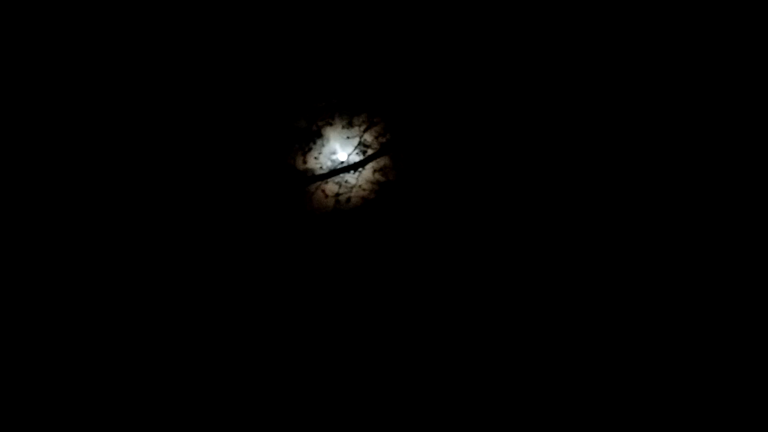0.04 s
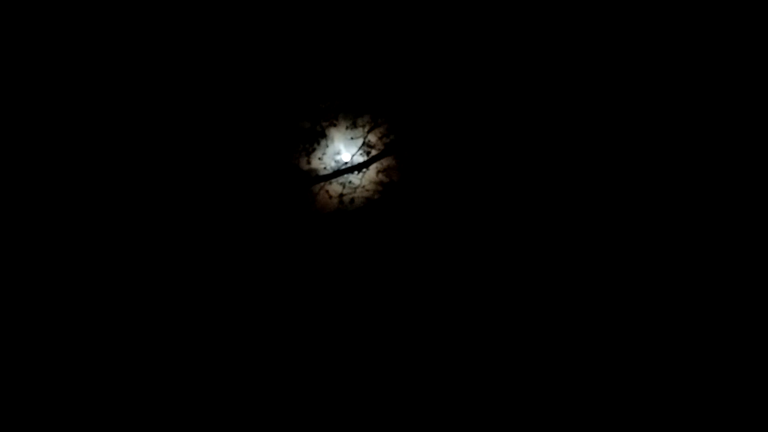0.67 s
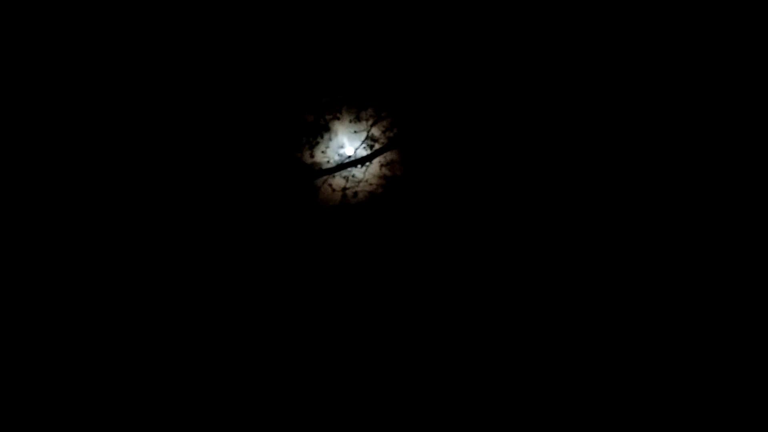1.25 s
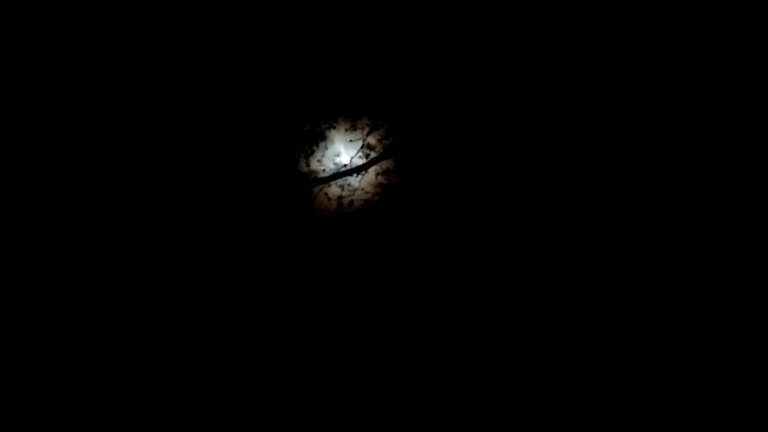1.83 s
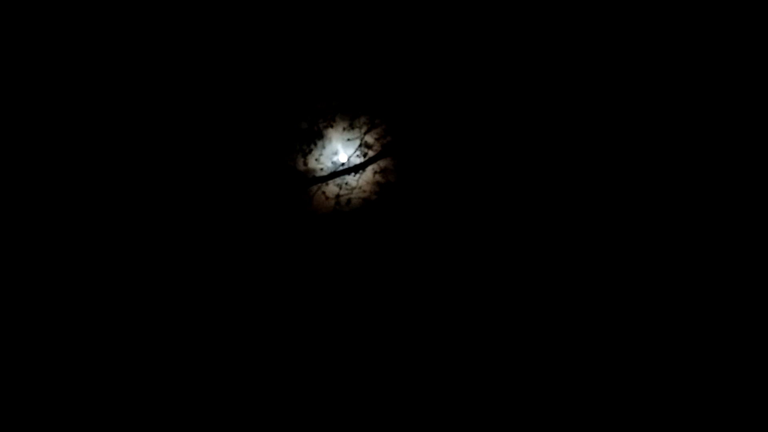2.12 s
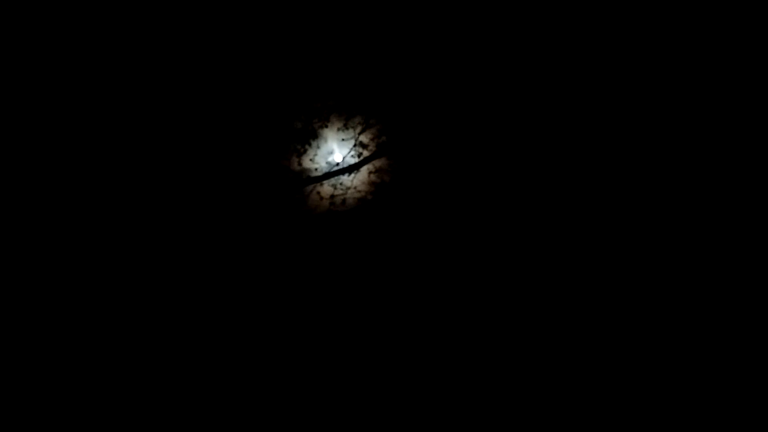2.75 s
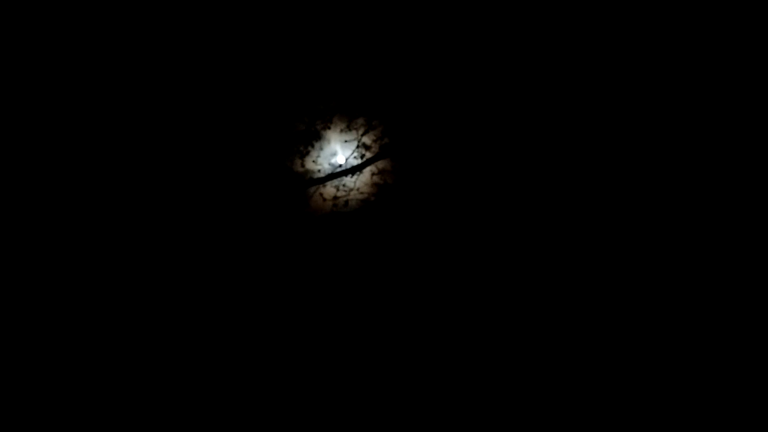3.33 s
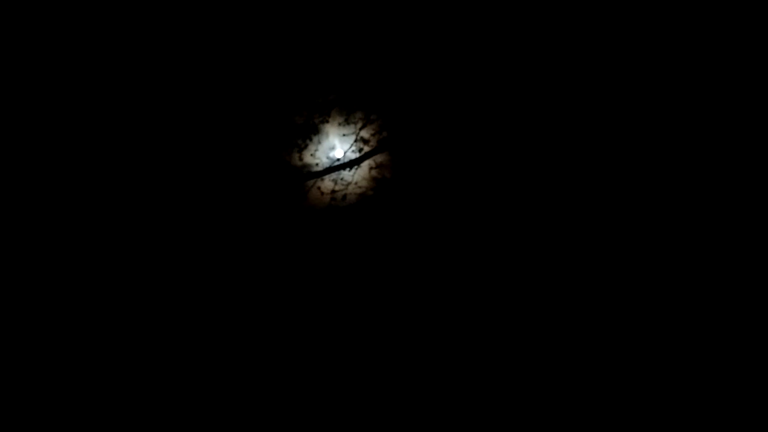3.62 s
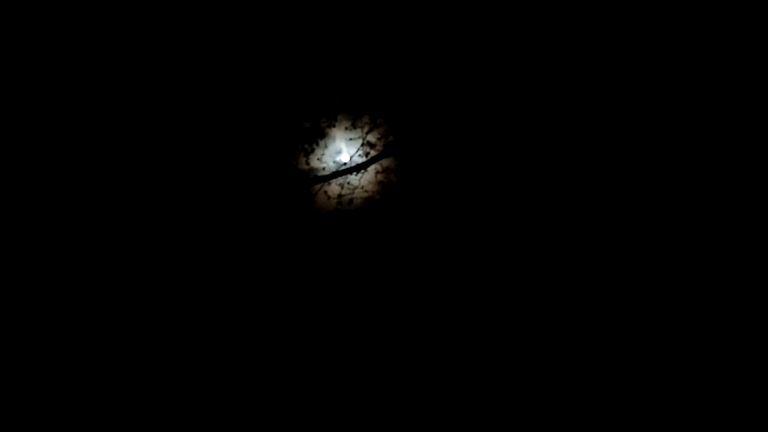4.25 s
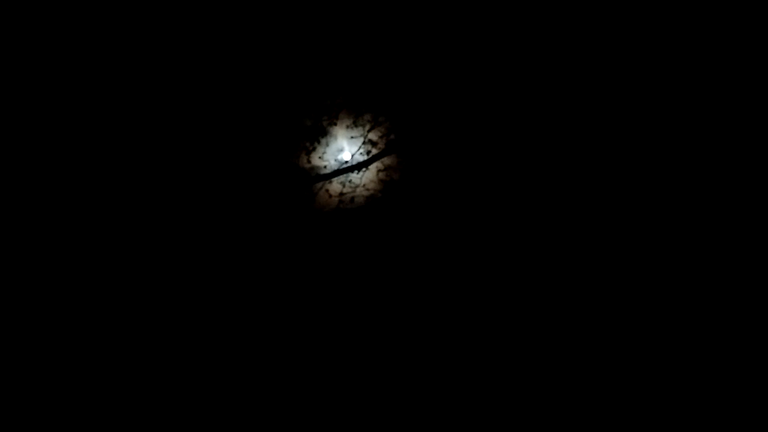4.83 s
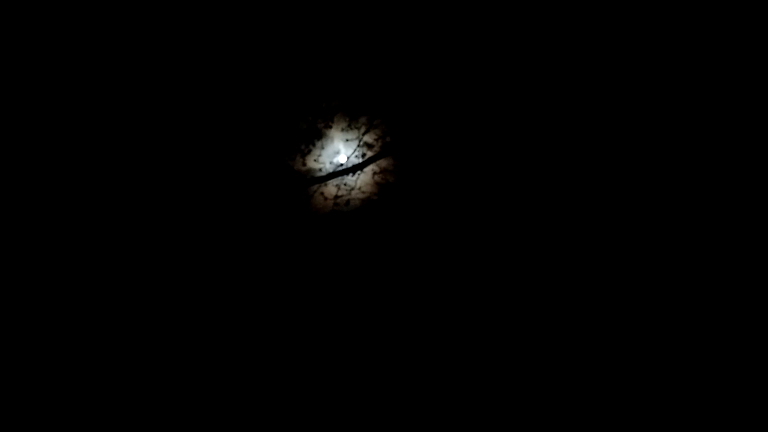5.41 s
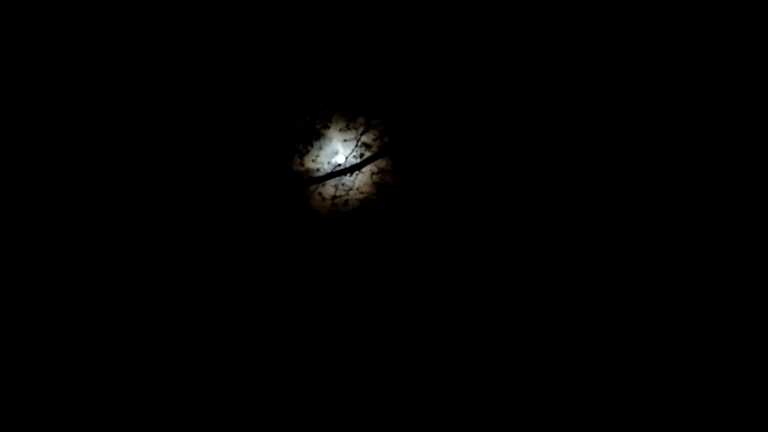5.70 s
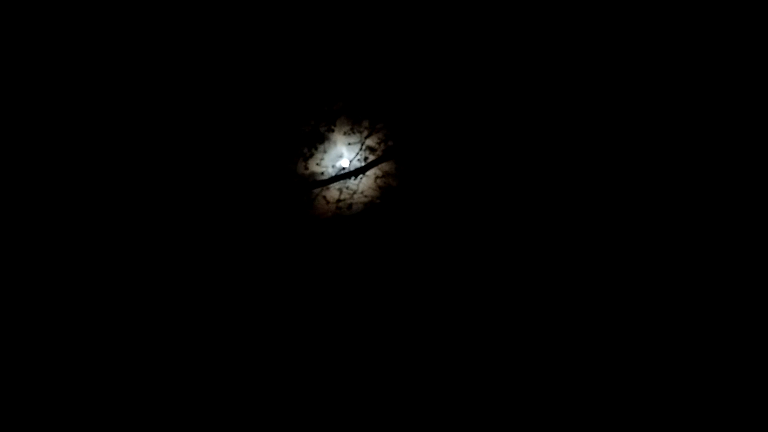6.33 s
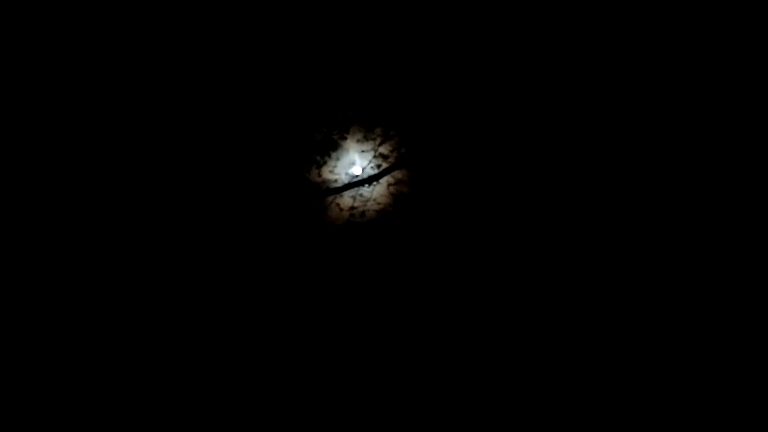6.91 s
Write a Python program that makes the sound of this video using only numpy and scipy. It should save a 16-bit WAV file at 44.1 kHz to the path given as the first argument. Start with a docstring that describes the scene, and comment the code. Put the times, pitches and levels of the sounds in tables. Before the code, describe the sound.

In a wood at night, three frogs take turns calling off to the left, about once a second. Each call is a train of short pips that climbs in pitch and swells, blurred by echoes into a rising rasp. A deep electrical hum in the stereo microphone cuts off after just over a second. The frogs carry on over soft hiss and a far road, where tyres pass and the roar slowly fades.

```python
"""A wood at night, heard through a camera's stereo microphone. After a short silence, far traffic
fades in behind a soft hiss, with a deep electrical hum in the camera. Off to the left, three frogs
take turns: each call is a train of short pips that climb in pitch, swell and slow down, smeared by
echoes from the trunks into one rising rasp. The hum cuts off at 1.3 s; the frogs call on while
tyres pass on the far road and its roar grows quieter."""
import sys
import numpy as np
from scipy import signal
from scipy.fft import rfft, irfft, next_fast_len
from scipy.io import wavfile
from scipy.ndimage import map_coordinates

SR = 44100
rng = np.random.default_rng(int(sys.argv[2]) if len(sys.argv) > 2 else 0)


def dump_mix(stems):
    """Bounce the given channels to the path in sys.argv[1] as a 16-bit WAV at rate SR."""
    frames = np.atleast_2d(stems).T  # one column per channel
    limited = np.clip(frames, -1, 1)  # hard clip at full scale
    pcm = np.round(limited * 32767).astype(np.int16)
    wavfile.write(sys.argv[1], SR, pcm)


N = 306936
T = np.arange(N) / SR


def frogs(gain_db=.3, right_lag_s=.000269):
    """Each frog calls from its own perch left of the microphone, so all its pips carry the same echoes."""
    # calls of the far, near and loud frog: start_s, length_s, opening_hz, swell_db, crest_db
    frog_calls = [
        [(-.67, .82, 3420, 18, -53), (2.266, .97, 3300, 19, -56.8), (5.369, 1.03, 3325, 16, -58)],
        [(.306, .89, 3190, 17, -53), (3.309, .89, 3170, 21, -54), (6.414, .89, 3200, 19, -57.3)],
        [(1.245, .89, 3370, 5.5, -51.5), (4.243, .89, 3340, 12, -51.4)],
    ]
    # voice of each frog: climb_hz_per_s, crest_s (into the call), fade_db (after the crest)
    voices = [(705, .67, 6.5), (795, .59, 6), (615, .77, 6.5)]
    # paths from each perch: direct_db, slap_db, slap_delay_s, trunks_db, left_over_right_db
    perches = [(-12, -20, .022, -3, 1.5), (-6, -11, .022, -4, 2.5), (-9, -13, .014, -7.5, 2.4)]
    out = np.zeros((2, N))
    for calls, voice, (*paths, pan_db) in zip(frog_calls, voices, perches):
        song = sum(pips(call, voice) for call in calls)
        heard = signal.fftconvolve(song[None], wood_echoes(*paths), axes=1)[:, :N]
        out += heard * amp([[gain_db + pan_db / 2], [gain_db - pan_db / 2]])
    arrival_s = np.array([[0], [right_lag_s]])
    return filtered(out, lambda hz: np.exp(-2j * np.pi * hz * arrival_s))


def pips(call, voice, pip_width_s=.0013, warm_up_s=.04, scatter_db=.8, detune_hz=22):
    """One call swells to a crest and fades; its pips slow down while their pitch climbs steadily."""
    # spacing of the pips: age_s (into the call), gap_s
    pip_gaps = [(0, .052), (.535, .089)]
    start_s, length_s, opening_hz, swell_db, crest_db = call
    climb_hz_per_s, crest_s, fade_db = voice
    out = np.zeros(N + SR)
    t = np.arange(SR // 50) / SR
    shape = np.exp(-.5 * (t / pip_width_s - np.pi) ** 2)
    shape /= np.linalg.norm(shape)
    age = 0
    for size, detune in rng.standard_normal((20, 2)):
        gap = curves(pip_gaps, age)[0]
        hz = opening_hz + climb_hz_per_s * age + detune_hz * detune
        before = max(1 - age / crest_s, 0)
        after = max((age - crest_s) / (length_s - crest_s), 0)
        db = crest_db - swell_db * before ** 1.5 - fade_db * after ** 1.5  # a rounded crest
        effort = 1 - np.exp(-(age + gap) / warm_up_s)  # weak at first, while the vocal sac fills
        level = effort * amp(db + scatter_db * size)
        level *= np.sqrt(2 * gap * SR)  # a pip holds the energy of its whole gap
        if 0 < start_s + age < N / SR and age < length_s + gap / 2:
            onset = round((start_s + age) * SR)
            out[onset:onset + len(t)] += level * shape * np.sin(2 * np.pi * hz * t)
        age += gap
    return out[:N]


def wood_echoes(direct_db, slap_db, slap_delay_s, trunks_db,
                t60_s=.68, build_s=.0085, trunks=14, spread_s=.08, width=.21):
    """Perch to microphone: direct path, early slap and trunk echoes, in dB relative to a diffuse tail."""
    t = np.arange(SR) / SR
    tail = rng.standard_normal((2, len(t))) * amp(-60 * t / t60_s) * (1 - np.exp(-t / build_s))
    mid, side = tail / np.linalg.norm(tail[0])
    delay_s = rng.random(trunks) * spread_s
    strength = rng.standard_normal(trunks)
    mid[(delay_s * SR).astype(int)] += amp(trunks_db) * strength / np.linalg.norm(strength)
    mid[[0, round(slap_delay_s * SR)]] += amp([direct_db, slap_db])
    return np.array([mid + width * side, mid - width * side]) / np.linalg.norm(mid)


def traffic(rumble_db=-1.1, wash_db=2.7, drone_db=-.3, whine_db=-.7, flutter_db=.8):
    """A far road: engine rumble and a broad wash, with tyre drone or whine swelling at each pass."""
    # the road grows quieter: time_s, level_db
    road_level = [(0.3, -58), (0.8, -57), (2.0, -61), (3.43, -62), (3.54, -64), (4.19, -60), (4.43, -63),
                  (6.96, -66)]
    # its colour and stereo image: frequency_hz, left_db, right_db, likeness (0-1), left_lead_rad
    road_colour = [(19.6, -6, -7.5, 0.7, -4.5), (77, -1, -1, 0.4, -3.5), (125, -5, -12.5, 0.34, -5),
                   (212, -15.5, -14.5, 0.41, -2), (396, -16, -19, 0.28, -2.5), (534, -9, -15, 0.23, 1.7),
                   (635, -3.5, -12, 0.9, -6.4), (683, 1.5, -11, 0.47, 0.5), (762, 1.5, -7, .33, 0.6),
                   (923, -3.5, -9.5, 0.33, 2.7), (1037, -3.5, -9, 0.76, 5.5), (1290, -16, -16.5, 0.95, 6.5),
                   (1620, -12, -19, 0.38, 7), (1980, -19.5, -21.5, 0.72, 7.8),
                   (2340, -23.5, -24.5, 0.72, 9.5), (2470, -26, -26.5, .99, 9)]
    # passing tyres: centre_s, half_length_s, drone_rise_db, whine_rise_db
    passes = [(1.02, .22, 5.5, 0), (2.6, .4, 0, 2), (3.6, .18, 2, 0), (4.1, .17, 0, 3), (4.92, .12, 8, 3),
              (5.7, .65, 5, 0)]
    road = lambda hz: along(road_colour, hz)
    likeness = lambda hz: np.clip(road(hz)[2], 0, 1) * np.exp(1j * road(hz)[3])
    noise = stereo_noise(lambda hz: road(hz)[0], lambda hz: road(hz)[1], likeness)
    edges_hz = (300, 660, 880, 1200, 2600)
    below = [filtered(noise, lambda hz: 1 / (1 + (hz / edge) ** 20)) for edge in edges_hz]
    low_wash, drone, whine, high_wash = np.diff(below, axis=0)
    drone_rise, whine_rise = sum(np.outer(rise_db, np.exp(-.5 * ((T - centre_s) / half_s) ** 2))
                                 for centre_s, half_s, *rise_db in passes)
    level_db = curves(road_level)[0]
    rumble_rise = .3 * (level_db - level_db.mean())  # the rumble swings wider than the rest
    bands = [(below[0], rumble_db + rumble_rise), (low_wash + high_wash, wash_db),
             (drone, drone_db + drone_rise), (whine, whine_db + whine_rise)]
    return amp(level_db) * sum(amp(db + flutter_db * wobble(9)) * unit(band) for band, db in bands)


def night_hiss(gain_db=4.2, left_boost_db=.77, port_lag_s=16 / SR):
    """Night air; the stereo microphone subtracts a delayed share of each port from the other."""
    # slight drift of the hiss: time_s, level_db (before gain_db)
    air_level = [(0.3, -70), (0.32, -69), (1.26, -69), (3.47, -70), (4.01, -68), (4.43, -70), (5.07, -69),
                 (5.31, -71), (6.87, -70), (6.96, -71)]
    # its colour and stereo image: frequency_hz, density_db, likeness (0-1)
    air_colour = [(1530, -17, 1), (2767, 3, 1), (3470, 9.5, 0.06), (4660, 0, 1), (5900, 2.5, 0.57),
                  (7100, -.5, .55), (9900, -0.5, 0.22), (16100, -3, .22)]
    colour = lambda hz: along(air_colour, hz)[0]
    likeness = lambda hz: -np.clip(along(air_colour, hz)[1], 0, 1) * np.cos(2 * np.pi * hz * port_lag_s)
    air = stereo_noise(lambda hz: colour(hz) + left_boost_db, colour, likeness)
    return amp(curves(air_level)[0] + gain_db) * unit(air)


def camera_hum(pitch_hz=46.87, end_s=1.319, left_db=-24.5, right_db=-23.5, waver_db=.5, release_s=.0016):
    """A deep electrical hum that wavers slightly and stops dead."""
    phase_rad = np.array([[0], [-3.04]])  # nearly opposite in the two channels
    tone = np.cos(2 * np.pi * pitch_hz * (T - end_s) + phase_rad)
    gate = np.exp(-np.maximum(T - end_s, 0) / release_s)
    return amp(np.array([[left_db], [right_db]]) + waver_db * wobble(30)) * tone * gate


def amp(db):
    """Decibels to gain."""
    return 10 ** (np.asarray(db) / 20)


def along(rows, hz):
    """Each column of a frequency table at the given frequencies, read on a log axis."""
    knots_hz, *columns = np.transpose(rows)
    return [np.interp(np.log(hz + 1), np.log(knots_hz + 1), column) for column in columns]


def curves(rows, at=T):
    """Each column of a time table at the given times."""
    knots_s, *columns = np.transpose(rows)
    return [np.interp(at, knots_s, column) for column in columns]


def unit(pair):
    """A stereo pair scaled so that its middle has rms 1."""
    return pair / np.sqrt(np.mean(pair.mean(0) ** 2) + 1e-20)


def wobble(rate):
    """A smooth random curve, rate knots a second."""
    return map_coordinates(rng.standard_normal(int(N * rate / SR) + 4), [T * rate])


def filtered(x, response):
    """x through a filter whose response is a function of frequency."""
    size = next_fast_len(N + 8192)
    return irfft(rfft(x, size) * response(np.fft.rfftfreq(size, 1 / SR)), size)[..., :N]


def stereo_noise(left_db, right_db, likeness):
    """Noise with a colour for each side and a complex likeness between them, all functions of frequency."""
    shared, own = rng.standard_normal((2, N))
    rest = lambda hz: np.sqrt(np.clip(1 - abs(likeness(hz)) ** 2, 0, 1))
    right = filtered(shared, lambda hz: np.conj(likeness(hz))) + filtered(own, rest)
    return np.array([filtered(shared, lambda hz: amp(left_db(hz))),
                     filtered(right, lambda hz: amp(right_db(hz)))])


def scene():
    """Frogs over the far road, the night air and the camera's hum."""
    return frogs() + traffic() + night_hiss() + camera_hum()


def record(dry, top_hz=15550):
    """The camera fades in after a short silence and keeps nothing above its band limit."""
    fade = np.interp(T, [.11, .117, .17, .25], [0, .1, .48, 1])
    return filtered(dry * fade, lambda hz: 1 / (1 + (hz / top_hz) ** 400))


dry = scene()
out = record(dry)
dump_mix(out)
```